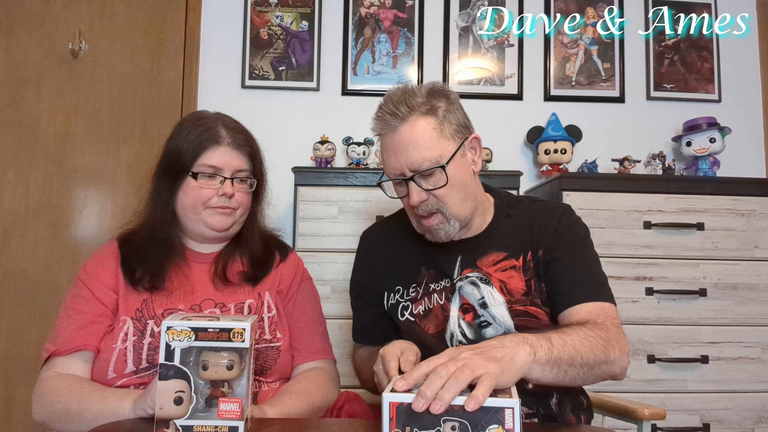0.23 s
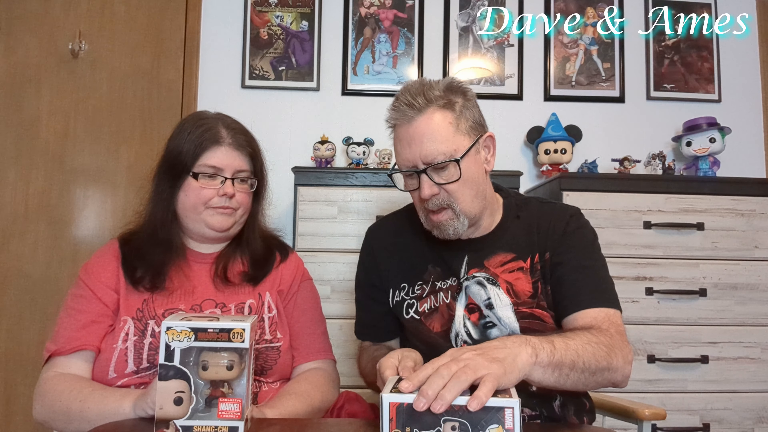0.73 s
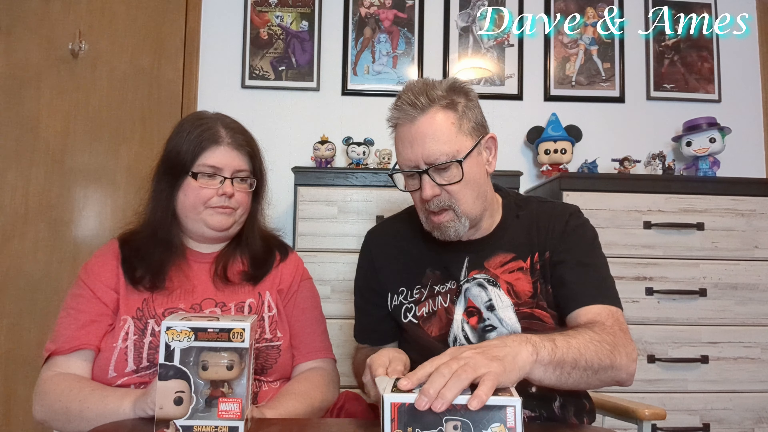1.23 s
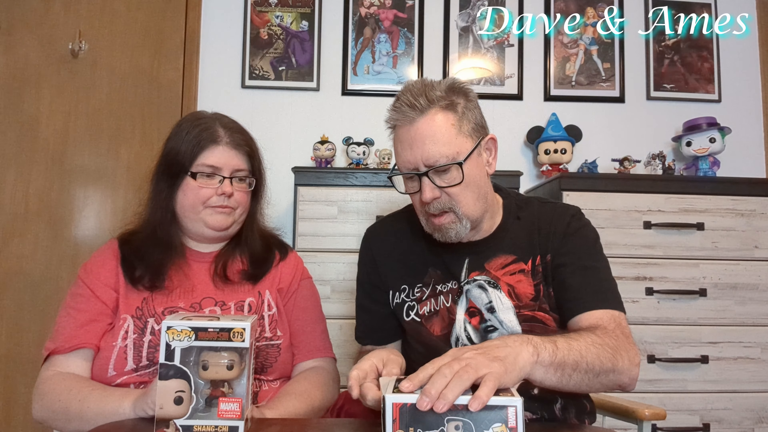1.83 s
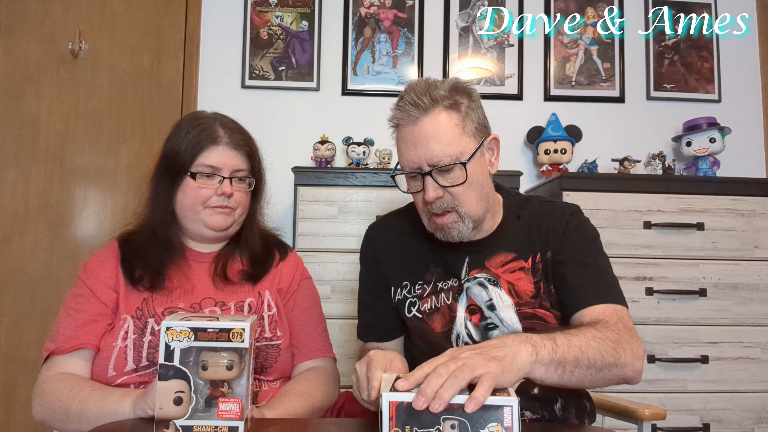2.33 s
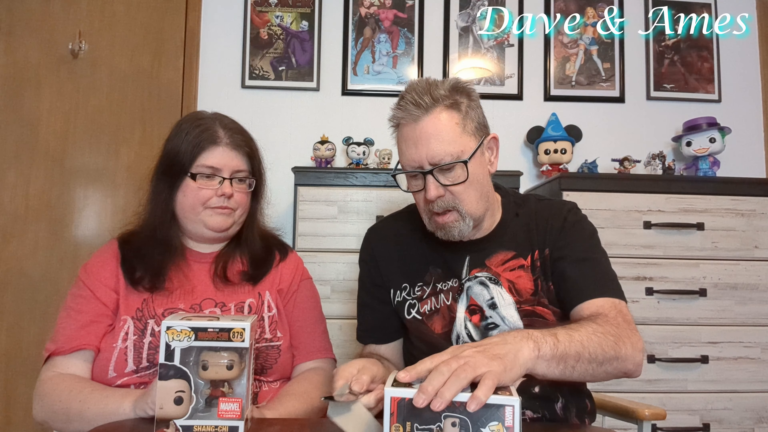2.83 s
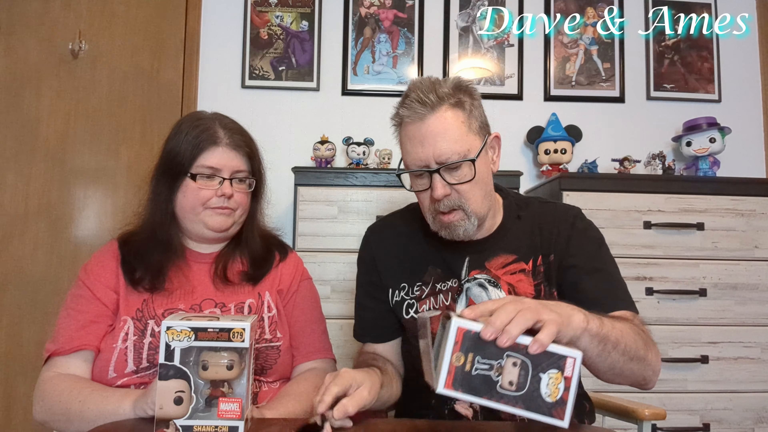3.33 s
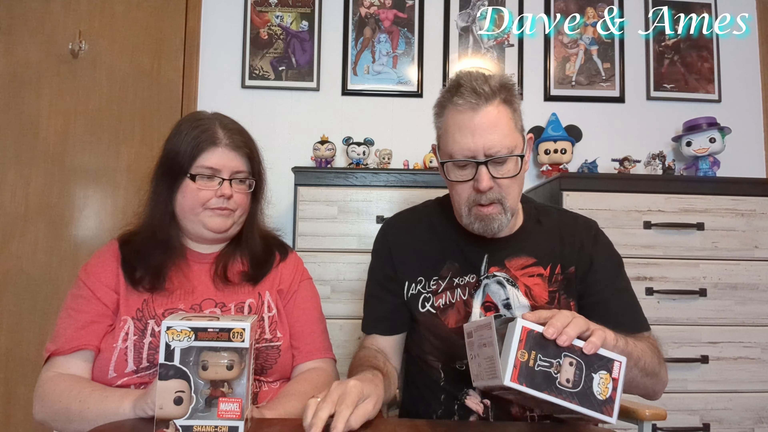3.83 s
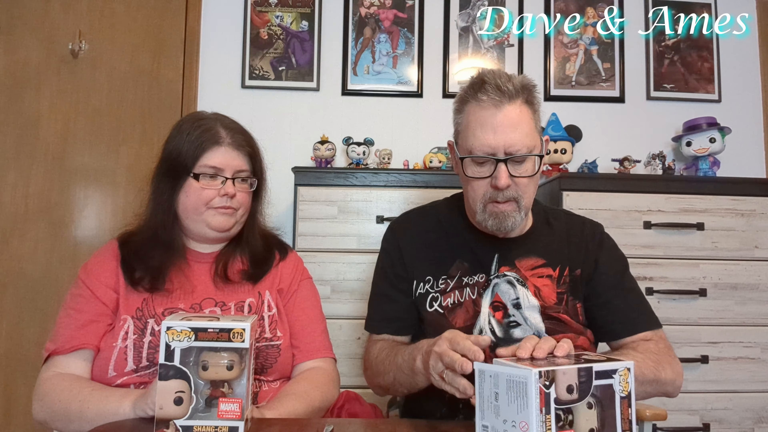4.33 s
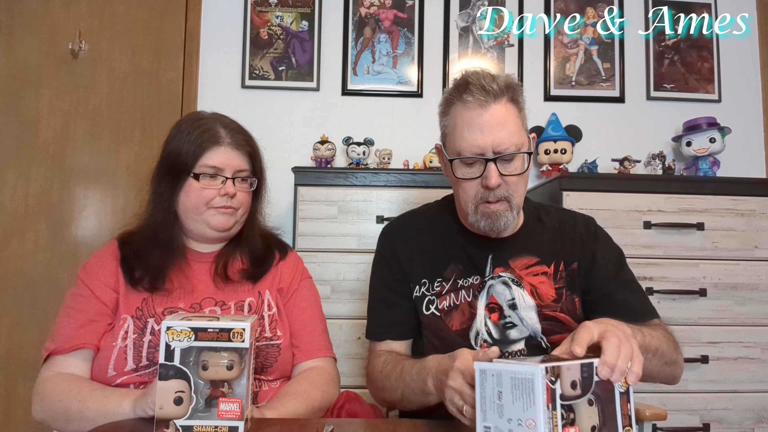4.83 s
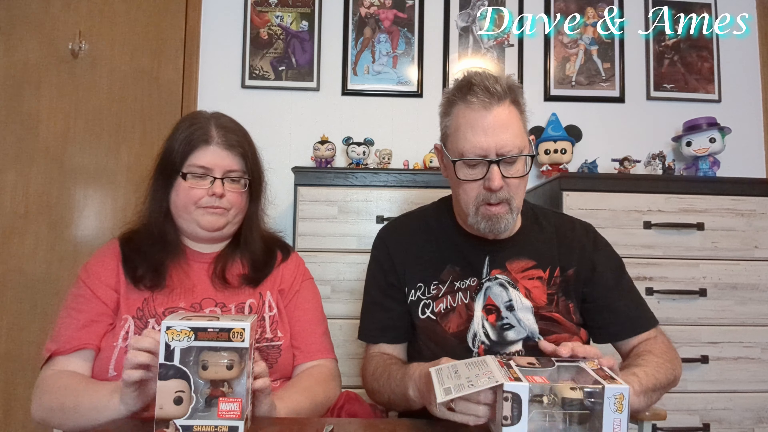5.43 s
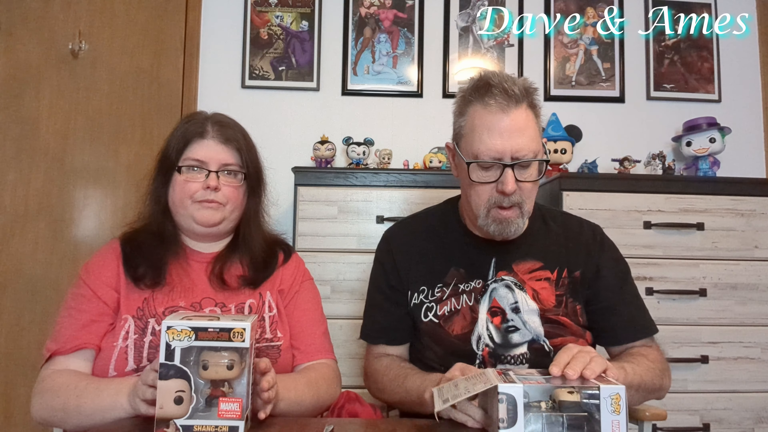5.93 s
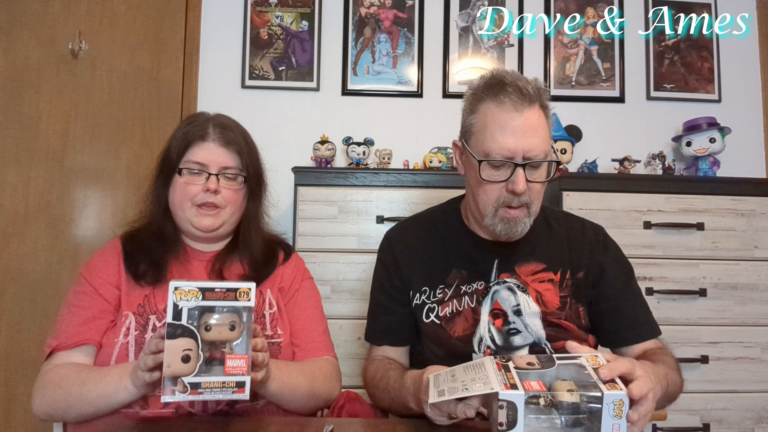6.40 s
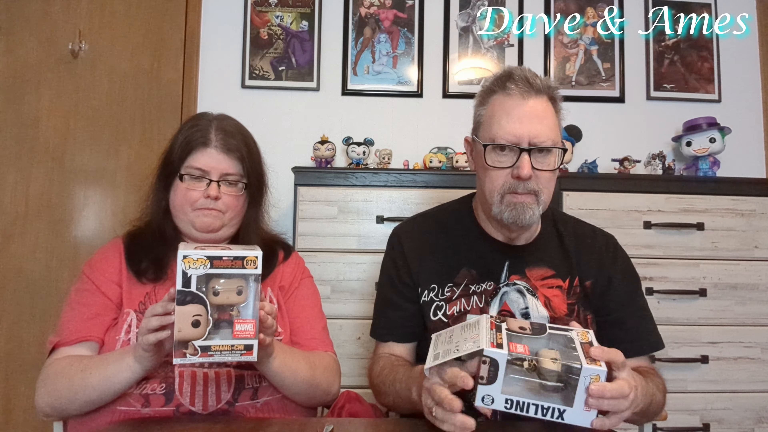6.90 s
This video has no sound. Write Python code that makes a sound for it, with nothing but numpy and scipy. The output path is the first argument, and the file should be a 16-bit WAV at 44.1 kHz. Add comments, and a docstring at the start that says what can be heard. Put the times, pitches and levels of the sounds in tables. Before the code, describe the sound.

Close handling of a small card box in a quiet room: soft scuffs, boxy knocks, a hard pop midway, crinkly plastic clicks and scrapes.

```python
"""A short rub of hands on card comes first, then pops and knocks as a thin cardboard box is pried open
on a wooden table in a small room and its plastic insert slides out. Blows and scuffs are crunches of
slips that ring panels, edges and table; rubbing is clumps of friction clicks; plastic ticks and hisses;
scrapes and small bumps are bursts of slips ringing one part. Echoes and quiet room air surround it, heard
by a pair of close microphones with a noise suppressor that turns the treble down in the pauses."""
import sys
import numpy as np
from scipy import signal
from scipy.fft import rfft, irfft
from scipy.io import wavfile

SR = 44100
rng = np.random.default_rng(int(sys.argv[2]) if len(sys.argv) > 2 else 0)


def transcribe(signal):
    """Save signal, clipped to [-1, 1], as a 16-bit WAV file at the path in sys.argv[1]."""
    frames = np.atleast_2d(signal).T
    limited = np.clip(frames, -1, 1)
    pcm = np.round(limited * 32767).astype(np.int16)
    wavfile.write(sys.argv[1], SR, pcm)


N = 315800  # length in samples, about 7.2 s

# Pops and knocks. Each row: start in seconds, level in dB before mixing, ring of the struck panel in Hz,
# stiff edges in dB, crack in dB, table thud in dB (these three set against the body of the blow),
# time until the press is hardest in ms, centre of the edge ring in Hz.
KNOCKS = [(0.107, -30.5, 415, 7.5, -2.5, -5, 3.85, 1650), (0.428, -24.5, 472, -8, -23, -24, 2.15, 1490),
          (0.617, -17.5, 1780, -5, -3, -21.5, 1.37, 2470), (0.698, -16.5, 490, -6, -10.5, -26, 1.28, 1380),
          (0.903, -17, 556, -7, -9, -15.5, 6.1, 1500), (1.277, -21, 497, -13, -16.5, -44, 2.77, 1820),
          (1.355, -22.5, 490, -2, -21, -27, 3.3, 1750), (2.416, -28.5, 415, -3.5, -12.5, -8.5, 1.57, 1580),
          (2.502, -30, 580, -16, -27, -27, 1.6, 1600), (2.531, -30, 436, -24, -18, -6.5, 1.4, 1600),
          (2.63, -34, 634, 0, -9, -21, 1.8, 1390), (2.765, -23, 458, -7.5, -12, -15, 3.24, 1630),
          (2.915, -38.5, 550, -8, -7, -39, 3.3, 1790), (3.592, -35.5, 400, -26, -12.5, 2, 1.57, 1600),
          (3.736, -5, 453, 2, -13, -12, 0.73, 1405), (4.208, -18, 850, -2.5, -15.5, -20, 1.64, 1680),
          (4.327, -17.5, 670, -2, -16, -13.5, 5.5, 1270), (4.387, -20, 370, -14, -20, -22, 1.75, 1510),
          (4.7, -32, 554, -12.5, -12.5, -16, 5.34, 1300), (4.836, -28.5, 530, -23, -26, -4.5, 1.37, 1390),
          (4.967, -26.5, 1190, -10, -18, -23, 1.9, 1500), (5.573, -29.5, 518, 0.5, -12.5, -13, 2.49, 1530),
          (6.034, -15, 720, -2.5, -14, -50, 4.84, 1526), (6.075, -25.5, 950, 5.5, -33, -47, 3.3, 1750),
          (6.376, -38.5, 870, 5, -29, -20, 5, 1420)]
# Flaps and fingers scuff, swelling and fading. Each row: the same as a knock, in the same units,
# but without the last column.
SCUFFS = [(0.404, -33.5, 1530, 3, -39, -13, 2.85), (1.129, -35, 1400, -26, -15, -8, 41),
          (1.185, -30, 600, 0, -15, -18, 10.2), (1.545, -37, 490, -3.5, -10, -10, 30),
          (1.965, -35, 496, -5.5, -18, -4, 12.6), (2.278, -34.5, 480, -21, -36, -23, 9.4),
          (3.109, -38, 1520, -5, -33, -9.5, 20), (3.224, -57, 840, -18, 12.5, 8, 6.5),
          (4.125, -49, 804, -26.5, -18, 0, 23), (4.295, -43, 530, -6, -4, -16, 9.7),
          (5.36, -46.5, 504, 1, 0.5, -23, 7.6), (5.661, -35, 1190, -14, -12, -38, 5.2),
          (5.754, -46, 330, -19, 3.5, -23, 7.2), (5.895, -30, 606, -3.5, -10.5, -24, 11.8),
          (6.188, -33.5, 560, -3, -12, -30, 7.1), (6.543, -43, 970, 3, -8, -31, 7.1),
          (6.62, -38, 665, 14, -8, -15, 6), (6.923, -34.5, 723, -3.5, -18, -16, 12),
          (7.114, -43.5, 640, -6, -3, -37, 40)]
RIMS_HZ = 1600  # centre of the edge ring at rest


def knocks():
    """Blows and scuffs on the box, from short to drawn-out presses."""
    return contacts(KNOCKS) + contacts([(*row, RIMS_HZ) for row in SCUFFS])


# The broad faces of the box. Each row: pitch in Hz, strength in dB.
BOX = [(420, -7.5), (535, 7.5), (690, 0.5), (810, 5.5), (1080, -4.5)]
# Stiff edges and flaps. Each row: pitch in Hz, strength in dB.
RIMS = [(1600, 3.5), (2500, -14.5)]
# The wooden table. Each row: pitch in Hz, strength in dB, time to die by 60 dB in seconds.
TABLE = [(119.5, 0, 0.035), (157.5, 1, 0.032), (310, 1, 0.023)]
# Tone of rough rasping. Each row: frequency in Hz, strength in dB per Hz.
RASP = [(1500, 2.5), (2200, 0), (3500, -2.5), (6500, -8.5), (9000, -15.5)]
# Tone of smooth plastic hissing. Each row: frequency in Hz, strength in dB per Hz.
HISS = [(5000, -6), (8000, -4.5), (11000, -11.5), (16000, -10.5)]


def contacts(events, box_cycles=5.0, rim_cycles=6.8, box_db=-5, edge_db_per_octave=2.5, hiss_db=-5):
    """A crunch of slips sets panel, box, edges and table ringing, with a crack on top."""
    out, t = np.zeros(N), np.arange(int(.17 * SR)) / SR
    scatter_db, bend, snap_ms = 2.5, .06, 1.6
    panel_cycles, shortest_s = 7, .008
    for s, db, hz, rims_db, crack_db, thud_db, contact_ms, rims_hz in events:
        u = t / (min(contact_ms, 40) / 1000)
        press = u ** 2 * np.exp(-2 * u)
        white = rng.standard_normal((4, len(t)))

        # a short contact is mostly one snap
        slips = press * white[0]
        slips[np.argmax(press)] += snap_ms / contact_ms * np.sqrt(np.sum(press ** 2))

        panel = rings([(hz, 0, max(panel_cycles / hz, shortest_s))], t, 0)
        # the grip bends the card and shifts its pitches
        bent = t * np.exp(bend * white[3, 0])
        faces = rings(struck(BOX, box_cycles), bent, scatter_db)
        # a small high panel stirs the box less
        faces_db = box_db - edge_db_per_octave * np.log2(hz / BOX[1][0])
        edges = rings(struck(RIMS, rim_cycles), t * rims_hz / RIMS_HZ, scatter_db)
        body = panel + amp(faces_db) * faces + amp(rims_db) * edges
        body = signal.fftconvolve(body, slips)[:len(t)]

        thud = rings(TABLE, t * np.exp(2 * bend * white[3, 1]), scatter_db)
        thud = signal.fftconvolve(thud, slips)[:len(t)]

        # the crack outlasts the contact a little
        fade = signal.lfilter([1], [1, -amp(-60 / (0.014 * SR))], press)
        grit = colour(white[1], RASP) + amp(hiss_db) * colour(white[2], HISS)
        crack = fade / fade.max() * grit / 3

        blow = body / np.abs(body).max() + amp(thud_db) * thud / np.abs(thud).max()
        add(out, s, amp(db) * (blow + amp(crack_db) * crack))
    return out


# Hands and box rubbing and sliding. Each row: start in seconds, hold in seconds, then the levels in dB
# before mixing of card, rasp, smooth-plastic hiss and table rumble.
STROKES = [(0.0, 0.016, -50, -67, -100, -74), (0.423, 0.028, -61, -58.5, -95, -56),
           (0.667, 0.067, -83, -53.5, -63, -90), (0.937, 0.032, -50, -52, -96, -52.5),
           (1.19, 0.0035, -39, -46, -86, -49), (1.308, 0.097, -58, -58.5, -68, -60),
           (1.544, 0.077, -58.5, -96, -84, -55.5), (1.72, 0.065, -54, -62.5, -69.5, -59.5),
           (1.94, 0.29, -66.5, -82, -100, -68.5), (2.284, 0.14, -57.5, -62.5, -90, -60.5),
           (2.425, 0.16, -57, -63.5, -69, -68), (2.638, 0.14, -57.5, -62.5, -82, -61),
           (2.821, 0.038, -52.5, -59.5, -64, -56), (2.888, 0.11, -65.5, -67, -65, -71.5),
           (3.148, 0.02, -53, -68, -85, -78), (3.435, 0.15, -92, -70, -79, -71),
           (3.589, 0.081, -103, -61.5, -57.5, -64), (3.781, 0.0075, -37, -51.5, -86, -40),
           (4.306, 0.11, -45.5, -55, -57, -43), (4.735, 0.13, -55.5, -55.5, -61, -49.5),
           (4.933, 0.0087, -53.5, -60, -50.5, -55.5), (5, 0.033, -64, -63.5, -69, -61),
           (5.156, 0.12, -58, -60, -59.5, -63), (5.37, 0.057, -76, -66.5, -67, -64.5),
           (5.53, 0.054, -70, -67.5, -71, -66), (5.674, 0.012, -51.5, -64, -52.5, -59),
           (5.764, 0.16, -57, -63.5, -58, -57), (6.018, 0.089, -58.5, -58, -58.5, -58),
           (6.19, 0.046, -49.5, -56.5, -55.5, -49), (6.31, 0.12, -64.5, -62, -63, -76),
           (6.432, 0.16, -67.5, -76, -74, -73), (6.657, 0.036, -46.5, -55, -61, -61.5),
           (6.752, 0.038, -50.5, -67, -62.5, -62.5), (6.848, 0.1, -65.5, -57, -56, -72),
           (7.004, 0.023, -70, -58.5, -66, -74), (7.145, 0.04, -50, -54.5, -56, -69)]
# Hands resting on the box: the levels in dB before mixing of card, rasp, hiss and rumble.
RESTING_DB = [-78, -104.5, -105, -78]
RISE_DB_PER_S, FALL_DB_PER_S = 431.5, 306  # how fast a stroke swells and fades
FOLLOWS_S = .06  # a stroke this soon after a knock begins with the knock


def strokes():
    """Each stroke swells, holds and fades; returns the gains of card, rasp, hiss and rumble."""
    t, out = np.arange(N) / SR, amp(RESTING_DB)[:, None]
    for s, hold_s, *levels_db in STROKES:
        rise_db = RISE_DB_PER_S * np.maximum(s - t, 0)
        fall_db = FALL_DB_PER_S * np.maximum(t - s - hold_s, 0)
        hits = [hit for hit, *_ in KNOCKS if s - FOLLOWS_S < hit <= s]
        begun = t >= max(hits, default=0)
        out = out + amp(levels_db)[:, None] * amp(-rise_db - fall_db) * begun
    return out


# Tone of rubbed card. Each row: frequency in Hz, strength in dB per Hz.
CARD = [(200, -29.5), (300, -12.5), (550, -1), (800, -4), (1800, -13), (2600, -23.5), (4000, -37.5)]
# Tone of the rumble in the table. Each row: frequency in Hz, strength in dB per Hz.
RUMBLE = [(40, -1), (80, -5.5), (150, -4.5), (210, -16), (400, -3.5)]
LAID_DOWN_S, BOOM_HZ = 4.2, 73  # from then on the box lies on its side and stirs the table's lowest ring


def rubbing(crackle_db=-2, boom_db=-5.0):
    """Friction clicks and creases sound through the card, slow lumps through the table."""
    on_card, on_rasp, on_hiss, on_table = strokes()
    card = colour(friction(1500, 3.5, 4, 25), CARD)

    rumble = colour(friction(600, 3, 3, 8), RUMBLE)
    lying = np.arange(N) / SR > LAID_DOWN_S
    rumble = rumble + lying * amp(boom_db) * rms_one(ring(rumble, BOOM_HZ, 3.9))

    # rasp and hiss come off a wide face, so each side hears its own grains
    rasp = colour(np.array([friction(3500, 3.5, 4.5, 30) for side in "LR"]), RASP)
    hiss = colour(np.array([friction(6000, 3.5, 4, 25) for side in "LR"]), HISS)

    # each crease click is dealt to one of the small panels between the folds
    creases = friction(120, 5, 5, 10)
    panels_hz = np.geomspace(350, 2600, 12)
    dealt = rng.integers(0, len(panels_hz), N)
    crackle = sum(ring(creases * (dealt == k), hz, 14) for k, hz in enumerate(panels_hz))
    card = card + amp(crackle_db) * colour(crackle, CARD)
    return on_card * card + on_table * rumble, on_rasp * rasp + on_hiss * hiss


def friction(per_s, spread_db, clump_db, clump_hz):
    """Surface fibres catch and let go: clicks of uneven size that come in clumps."""
    r = np.exp(-2 * np.pi * clump_hz / SR)
    clump = rms_one(signal.lfilter([1], [1, -2 * r, r * r], rng.standard_normal(N)))
    size_db = spread_db * np.minimum(rng.exponential(1, N), 5) + clump_db * clump
    clicks = amp(size_db) * rng.choice([-1, 1], N)
    return clicks * (rng.random(N) < per_s / SR)


# Scrapes, small bumps and a low thud. Each row: start in seconds, length in seconds,
# average (rms) level in dB before mixing, taken with the ring-out, and pitch of the ringing part in Hz.
SCRAPES_AND_BUMPS = [(1.175, 0.046, -50, 2410), (1.579, 0.022, -58.5, 1900), (1.793, 0.015, -50.5, 500),
                     (2.336, 0.044, -58, 1790), (2.823, 0.025, -60.5, 2530), (3.047, 0.024, -64.5, 2650),
                     (3.11, 0.063, -54.5, 2340), (4.755, 0.0081, -50, 3250), (4.92, 0.016, -57, 3180),
                     (5.09, 0.035, -63, 620), (5.256, 0.019, -61, 190), (5.559, 0.0097, -59.5, 613),
                     (5.88, 0.009, -46, 420), (6.536, 0.068, -59.5, 1660), (6.85, 0.07, -63, 3320),
                     (7.004, 0.057, -64, 3300), (7.036, 0.033, -68, 2400)]


def scrapes_and_bumps():
    """Short bursts of uneven slips, swelling and fading, each ringing one part of the box or table."""
    out, slips = np.zeros(N), friction(2500, 4, 2.5, 60)
    for s, length_s, db, hz in SCRAPES_AND_BUMPS:
        n = int(length_s * SR)
        burst = slips[int(s * SR):][:n] * np.sqrt(np.hanning(n))
        ringing = ring(np.pad(burst, (0, n)), hz, cycles=11)
        add(out, s, amp(db) * rms_one(ringing))
    return out


# Thin plastic and tape tick. Each row: start in seconds, level of the ring in dB before mixing,
# pitch in Hz.
TICKS = [(2.763, -38.5, 6460), (3.238, -48, 3020), (3.406, -55.5, 3470), (3.581, -40.5, 2300),
         (4.326, -35, 6400), (4.808, -34.5, 9300), (4.873, -44, 5950), (5.367, -40.5, 12000),
         (5.565, -49, 7200), (5.766, -34, 8550), (5.808, -41, 14000), (5.905, -42, 8000),
         (6.035, -20.5, 13700), (6.664, -32, 9050), (6.916, -31, 6050)]


def ticks(cycles=22.0, click_db=-6):
    """A snap of thin sheet: a bare click and a few cycles of ring."""
    out, t = np.zeros(N), np.arange(int(.02 * SR)) / SR
    for s, db, hz in TICKS:
        click = np.diff(rng.standard_normal(len(t) + 1)) * amp(-60 * t / 0.0089)
        snap = rings([(hz, 0, cycles / hz)], t, 0) + amp(click_db) * click
        add(out, s, amp(db) * snap)
    return out


# How the reflections die. Each row: frequency in Hz, time to die by 60 dB in seconds, strength in dB.
ROOM = [(99, 0.42, -5.5), (403, 0.15, 5), (1440, 0.25, 0.5), (4340, 0.15, 2), (13250, 0.17, -1)]
ECHO_MS, ECHO_HZ = 7.6, 2500  # the nearest wall: delay, and the pitch above which its echo is dull
# Strength of the wall echo in dB: left, right.
ECHO_DB = [-12, -11]


def room(x, wet_db=-3, first_s=0.0033, build_s=0.0021):
    """One clear echo, and dense reflections that build up and die band by band."""
    t = np.arange(SR // 2) / SR
    tail = diffuse(len(t), lambda hz: amp(at_hz(ROOM, hz, axis=2) - 60 * t / at_hz(ROOM, hz)))
    tail = tail * np.clip((t - first_s) / build_s, 0, 1)
    tail = amp(wet_db) * tail / np.sqrt(np.sum(tail ** 2) / 2)
    bounce = np.arange(len(t)) == int(ECHO_MS * SR / 1000)
    wall = signal.lfilter(*signal.butter(1, ECHO_HZ, fs=SR), bounce)
    response = tail + amp(ECHO_DB)[:, None] * wall
    return signal.fftconvolve(x[None], response, axes=1)[:, :N]


# Tone of the quiet room. Each row: frequency in Hz, strength in dB per Hz.
AIR = [(40, 16.5), (136, -6), (307, -10.5), (530, 7.5), (1170, -26), (1700, -5), (3000, -12), (7000, -21.5),
       (9000, -41.5)]
AIR_DB = -65


def room_air():
    """The steady room tone: shaped noise that arrives from all around."""
    return amp(AIR_DB) * rms_one(diffuse(N, lambda hz: amp(at_hz(AIR, hz))))


# How alike left and right are in sound from all around. Each row: frequency in Hz, likeness from 0 to 1.
LIKENESS = [(100, 0.87), (400, 0.83), (1000, 0.036), (2500, 0.027), (8000, 0.099), (14000, 1)]
EDGES = 35 * 2 ** np.arange(0, 9.1, .5)  # limits of the half-octave bands, Hz
CENTRES = np.sqrt(EDGES[1:] * EDGES[:-1])


def diffuse(length, gain):
    """Stereo noise, band by band, with the likeness of a diffuse field; gain(hz) shapes each band."""
    out, white = 0, rng.standard_normal((2, 2, length))
    for k, hz in enumerate(CENTRES):
        mid, side = band(white[k % 2], k) * gain(hz)
        alike = np.clip(at_hz(LIKENESS, hz), -1, 1)
        out = out + np.sqrt(1 + alike) * mid + np.sqrt(1 - alike) * side * [[1], [-1]]
    return out


def band(x, k):
    """Keep only the k-th half-octave band."""
    return signal.sosfilt(signal.butter(2, EDGES[k:k + 2], "band", fs=SR, output="sos"), x)


def amp(db):
    """Turn dB into gain."""
    return 10 ** (np.asarray(db) / 20)


def rms_one(x):
    """Scale to rms 1."""
    return x / np.sqrt(np.mean(x ** 2) + 1e-20)


def at_hz(points, hz, axis=1):
    """Read a column of a table against log frequency."""
    points = np.array(points)
    return np.interp(np.log(hz), np.log(points[:, 0]), points[:, axis])


def colour(x, spectrum):
    """Shape a sound by a spectrum, steeply closed outside it; rms 1."""
    hz = np.maximum(np.fft.rfftfreq(x.shape[-1], 1 / SR), 1)
    low, high = spectrum[0][0], spectrum[-1][0]
    skirt = 1 / (1 + (low / hz) ** 4) / (1 + (hz / high / 1.3) ** 8)
    return rms_one(irfft(rfft(x) * amp(at_hz(spectrum, hz)) * skirt, x.shape[-1]))


def struck(modes, cycles):
    """Give each mode a 60 dB decay of so many cycles."""
    return [(hz, db, cycles / hz) for hz, db in modes]


def rings(modes, t, scatter_db):
    """Sines set off together, each with a new strength, swell for a moment and die; peak 1."""
    hz, db, t60 = np.transpose(modes)[:, :, None]
    sign = (-1) ** np.arange(len(modes))[:, None]
    size = sign * amp(db + scatter_db * rng.standard_normal(db.shape))
    swell_and_die = (1 - np.exp(-2 * hz * t)) * amp(-60 * t / t60)
    x = np.sum(size * swell_and_die * np.sin(2 * np.pi * hz * t), axis=0)
    return x / np.abs(x).max()


def ring(clicks, hz, cycles):
    """One resonance, set off by clicks, that dies by 60 dB in so many cycles."""
    r = amp(-60 * hz / cycles / SR)
    poles = [1, -2 * r * np.cos(2 * np.pi * hz / SR), r * r]
    return signal.lfilter([1 - r, 0, r - 1], poles, clicks + 1e-18)


def add(out, s, x):
    """Mix a short sound in at a time in seconds."""
    i = int(s * SR)
    out[i:i + len(x)] += x[:N - i]


# The box moves to the right. Each row: time in seconds, how much later the left side hears it in ms.
LEFT_LAG = [(0, 0.085), (3.9, 0.07), (4.1, 0.2), (7.16, 0.14)]


def scene():
    """Box sounds reach the right microphone first; the room and its air surround them."""
    body, surface = rubbing()
    box = knocks() + ticks() + scrapes_and_bumps() + body
    lag = np.interp(np.arange(N) / SR, *np.transpose(LEFT_LAG)) * SR / 1000  # in samples
    late = box[np.maximum(np.arange(N) - np.round(lag).astype(int), 0)]
    direct = np.array([late * amp(2.0), box * amp(1.5)]) + surface
    return direct + room(box + surface[0]) + room_air()


CUTOFF_HZ = 16800  # nothing is kept from here up


def record(dry, open_db=-75, depth_db=16, knee_db=10.0, split_hz=2200, release_s=0.023, bass_hz=60):
    """The suppressor ducks the treble when its level falls under a threshold; bass and top are cut."""
    low = signal.sosfiltfilt(signal.butter(2, split_hz, fs=SR, output="sos"), dry)
    high = dry - low
    r = np.exp(-1 / (release_s * SR))
    power = signal.lfilter([1 - r], [1, -r], np.mean(high ** 2, axis=0))
    level_db = 10 * np.log10(power + 1e-14)
    shut = np.clip((open_db - level_db) / knee_db, 0, 1)  # 0 open, 1 fully ducked
    ducked = low + high * amp(-depth_db * shut)
    out = signal.sosfilt(signal.butter(4, bass_hz, "high", fs=SR, output="sos"), ducked)
    return signal.sosfilt(signal.cheby2(14, 70, CUTOFF_HZ, fs=SR, output="sos"), out)


dry = scene()
out = record(dry)
transcribe(out)
```